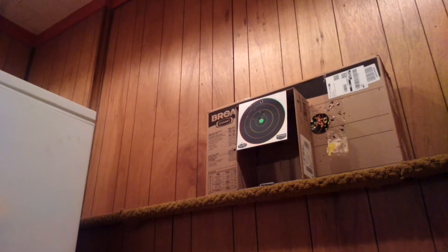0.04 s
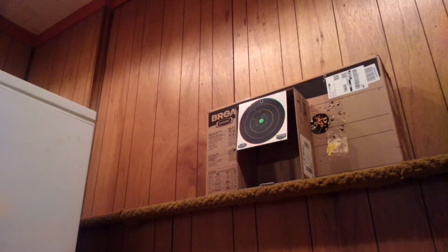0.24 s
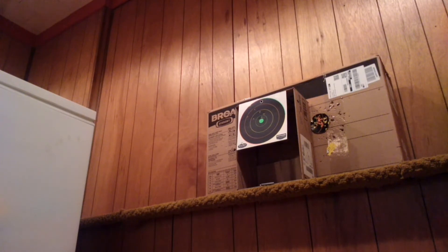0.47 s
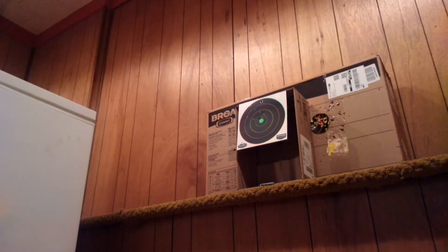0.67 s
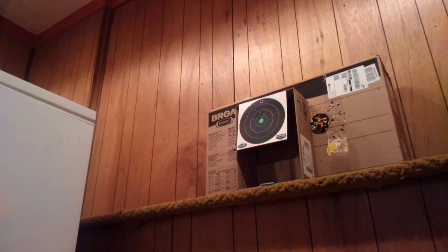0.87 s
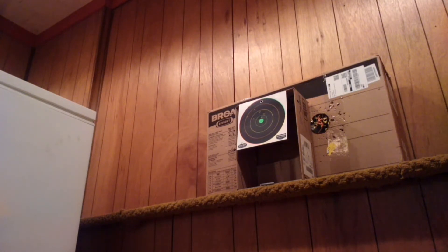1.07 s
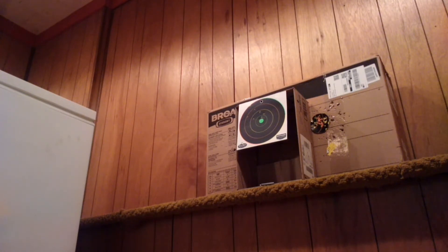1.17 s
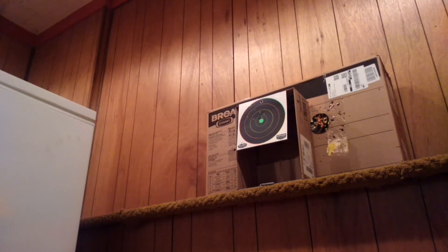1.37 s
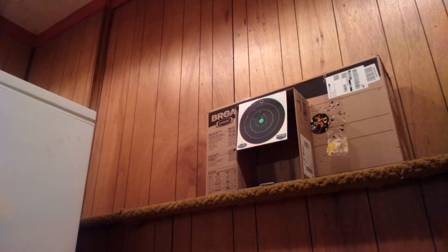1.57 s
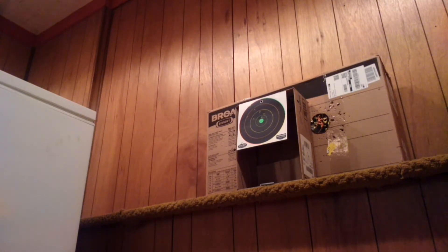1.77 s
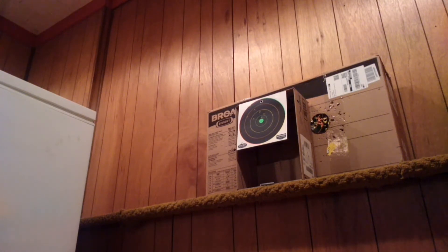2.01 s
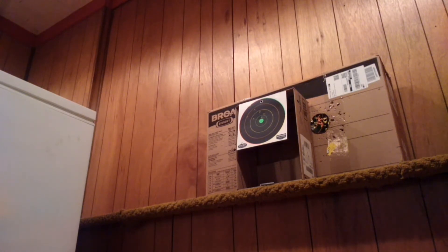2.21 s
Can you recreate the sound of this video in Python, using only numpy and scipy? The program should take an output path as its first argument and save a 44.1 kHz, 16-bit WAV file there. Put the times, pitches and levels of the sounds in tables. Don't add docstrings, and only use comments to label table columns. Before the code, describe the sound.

Single air pistol shot cracks into a cardboard box, followed by cocking clicks and cloth rustle.

```python
import sys
import numpy as np
from scipy import signal
from scipy.fft import rfft, irfft
from scipy.io import wavfile
from scipy.ndimage import map_coordinates

SR = 44100
rng = np.random.default_rng(int(sys.argv[2]) if len(sys.argv) > 2 else 0)


def generate_wav(signal):
    frames = np.transpose(np.atleast_2d(signal))
    scaled = np.clip(frames, -1, 1) * 32767
    pcm = np.round(scaled).astype(np.int16)
    wavfile.write(sys.argv[1], SR, pcm)


def volts_from_db(level):
    exponent = np.asarray(level, float) / 20
    return 10 ** exponent


N = 99225


def rms_one(x):
    return x / np.sqrt(np.mean(x ** 2) + 1e-20)


def at_hz(points, hz):
    p = np.array(points)
    return np.interp(np.log(np.maximum(hz, 1)), np.log(p[:, 0]), p[:, 1])


def colour(x, spectrum):
    size = x.shape[-1]
    hz = np.arange(size // 2 + 1) * SR / size
    return irfft(rfft(x) * volts_from_db(at_hz(spectrum, hz)), size)


def level(rows):
    s, db = np.transpose(rows)
    return volts_from_db(np.interp(np.arange(N) / SR, s, db, left=-120, right=-120))


def swell(start_s, rise_s, t60_s):
    t = np.arange(N) / SR - start_s
    rise = np.clip(t / rise_s, 0, 1) ** 2
    return rise * volts_from_db(-60 * np.maximum(t - rise_s, 0) / t60_s)


def band(x, hz, width_hz):
    r = np.exp(-np.pi * width_hz / SR)
    return signal.lfilter([1, 0, -1], [1, -2 * r * np.cos(2 * np.pi * hz / SR), r * r], x)


def grains(per_s, spread_db, spectrum):
    sizes = volts_from_db(spread_db * np.minimum(rng.exponential(1, N), 4)) * rng.standard_normal(N)
    happens = rng.random(N) < per_s / SR
    return rms_one(colour(sizes * happens, spectrum))


def sine(hz):
    return np.sin(2 * np.pi * hz * np.arange(N) / SR)


def contact(noise, s, db, hz, t60_s, rise_s):
    width_hz = hz / 2.17
    burst = band(band(noise, hz, width_hz), hz, 0.66 * width_hz) * swell(s, rise_s, t60_s)
    return volts_from_db(db) * burst / np.abs(burst).max()


def patches(x, gains):
    _, _, z = signal.stft(x, nperseg=512)
    bands = np.linspace(0, gains.shape[0] - 1, z.shape[0])
    moments = np.linspace(0, gains.shape[1] - 1, z.shape[1])
    at = np.meshgrid(bands, moments, indexing="ij")
    return signal.istft(z * map_coordinates(gains, at, order=1), nperseg=512)[1][:N]


# frequency in Hz, level in dB per Hz.
BLAST_SPECTRUM = [(530, -93), (900, -2.5), (2100, -9), (2280, 1), (2920, -15), (5710, 5.5), (13700, -15),
                  (14500, -48), (15000, -49)]


def shot():
    sear_s, rush_s, crack_s, box_s = .140, .152, .1608, .181
    sear_db, rush_db, crack_db, box_db, chatter_db = -40, -9, -9.5, -1.5, -15.5
    noise = rng.standard_normal(N)
    air = rms_one(colour(noise, BLAST_SPECTRUM))
    sear = rms_one(band(band(noise, 4900, 6400), 4900, 9000))
    sear = volts_from_db(sear_db) * sear * swell(sear_s - .003, 0.0019, 0.09)
    rush = volts_from_db(rush_db) * air * swell(rush_s, crack_s - rush_s, 0.028)
    crack = volts_from_db(crack_db) * rms_one(band(noise, 9500, 7500)) * swell(crack_s, 0.00042, 0.017)
    chatter = grains(1660, 2.1, BLAST_SPECTRUM)
    chatter = volts_from_db(chatter_db) * chatter * swell(crack_s - .002, 0.026, 0.082)
    box = volts_from_db(box_db) * air * swell(box_s, 0.00032, 0.004)
    return sear + rush + crack + chatter + box


# frequency in Hz, level in dB per Hz.
SLAM_SPECTRUM = [(26, -29), (45, -6.5), (527, -3.5), (639, -4.5), (840, -3.5), (971, -20.5), (1360, -13.5),
                 (1470, -22.5), (2100, -20), (2730, -34), (4620, -120)]


def piston_slam():
    start_s, rise_s, t60_s, knocks_per_s, slam_db = .1598, 0.001, 0.15, 1500, -15
    return volts_from_db(slam_db) * grains(knocks_per_s, 0.6, SLAM_SPECTRUM) * swell(start_s, rise_s, t60_s)


# start in seconds, level in dB.
SING_ONSETS = [
    (.236, -45),
    (.276, -50),
    (.30, -50),
    (.34, -56),
    (.405, -56),
    (.435, -53),
]


def singing_steel():
    hz, width_hz, rise_s, t60_s = 13050, 27, 0.0067, 0.14
    ring = rms_one(band(band(rng.standard_normal(N), hz, width_hz), hz, width_hz))
    return ring * sum(volts_from_db(db) * swell(s, rise_s, t60_s) for s, db in SING_ONSETS)


# start in seconds, peak in dB, pitch in Hz, ring T60 in seconds.
TICK_EVENTS = [(.402, -33, 9100, 0.0015), (0.4133, -22, 5200, 0.0037), (0.588, -44, 6900, 0.0026),
               (.612, -39.5, 5500, 0.0083), (.635, -40.5, 5000, 0.0055), (0.654, -39.5, 6300, 0.0093),
               (0.86, -38, 5660, 0.01), (.905, -44, 5400, .007), (1.15, -40, 1600, 0.018),
               (1.152, -38, 5970, 0.0036), (1.163, -34, 6100, 0.0042), (1.166, -42, 1260, 0.014),
               (1.191, -33, 1490, 0.015), (1.1982, -17, 1310, 0.0084), (1.2037, -10.5, 9200, 0.007),
               (1.220, -6.5, 5930, 0.018), (1.2375, -7, 5870, .004), (1.398, -20, 6040, 0.004),
               (1.398, -33.5, 1730, 0.024), (1.7104, -40.5, 6230, 0.0054), (1.763, -29.5, 7500, 0.0048),
               (1.775, -35, 5560, 0.0054), (1.848, -27.5, 11000, 0.0073), (1.9915, -37, 13400, 0.0079)]
# start in seconds, peak in dB, pitch in Hz, ring T60 in seconds, rise in seconds.
LATCH_EVENT = (1.2428, 3.0, 6800, .010, .0018)
# start in seconds, peak in dB, pitch in Hz, ring T60 in seconds.
BUMP_EVENTS = [
    (1.278, -42.5, 170, 0.09),
    (1.85, -40.5, 162, 0.22),
    (1.872, -43, 420, 0.11),
]
# time in seconds, level in dB.
SLIDE_PRESSURE = [(1.12, -69), (1.19, -51), (1.203, -29), (1.225, -24), (1.262, -19), (1.285, -49),
                  (1.33, -56), (1.40, -38.5), (1.47, -55)]
# frequency in Hz, level in dB per Hz.
SCRAPE_SPECTRUM = [(180, -73), (300, -16.5), (975, -12.5), (2210, -11.5), (2730, -3.5), (6840, -4.5),
                   (8600, -16), (14300, -11.5), (15000, -55)]


def action():
    noise = rng.standard_normal(N)
    ticks = sum(contact(noise, *row, rise_s=0.0018) for row in TICK_EVENTS)
    bumps = sum(contact(noise, *row, rise_s=0.018) for row in BUMP_EVENTS)
    latch = contact(noise, *LATCH_EVENT)
    scrape = grains(5000, 2.5, SCRAPE_SPECTRUM) * level(SLIDE_PRESSURE)
    return ticks + bumps + latch + scrape


# start in seconds, level in dB, pitch in Hz, rise in seconds, T60 in seconds.
HOLLOW_EVENTS = [
    (1.197, -24, 969, 0.0028, 0.099),
    (1.211, -21.5, 1667, 0.014, 0.053),
    (1.395, -33, 1650, 0.0022, 0.037),
]


def hollow_notes():
    return sum(volts_from_db(db) * sine(hz) * swell(s, rise_s, t60_s) for s, db, hz, rise_s, t60_s in HOLLOW_EVENTS)


# time in seconds, level in dB.
HAND_MOTION = [(.38, -48), (.42, -47), (.5, -64), (.57, -59.5), (.65, -59.5), (.73, -64.5), (.78, -53),
               (.87, -46.5), (.95, -53.5), (1.06, -67.5), (1.75, -67), (1.765, -52), (1.835, -52.5),
               (1.85, -37.5), (1.91, -35.5), (1.97, -46.5), (2.03, -45), (2.14, -101)]
# frequency in Hz, level in dB per Hz.
EARLY_SPECTRUM = [(710, -32), (1200, -18), (1650, -13), (2490, -4.5), (4050, -12), (5550, 0), (13600, -22),
                  (14500, -24), (15000, -72)]
# frequency in Hz, level in dB per Hz.
LATE_SPECTRUM = [(530, -26), (900, -9.5), (1140, -21.5), (2000, -1.5), (2200, -6.5), (6200, 1), (9480, -4),
                 (14300, -9), (15000, -26)]


def rustle():
    change_s, fleck_db = 1.4, 0.5
    late = np.arange(N) / SR > change_s
    cloth = np.where(late, grains(8000, 1.0, LATE_SPECTRUM), grains(8000, 2.8, EARLY_SPECTRUM))
    flecks = volts_from_db(fleck_db * rng.standard_normal((24, 70)))
    return patches(cloth, flecks) * level(HAND_MOTION)


# frequency in Hz, T60 in seconds.
ROOM_DECAY = [(100, 0.195), (400, 0.44), (1200, 0.4), (3000, 0.43), (5500, 0.37), (9000, 0.26),
              (14000, 0.26)]


def room(x):
    room_db, first_echo_s, build_s = 1, 0.0016, 0.0033
    white = rng.standard_normal((2, 2, N))
    late = np.roll(x, int(first_echo_s * SR))
    build = np.exp(-1 / (build_s * SR))
    edges_hz = 60 * 2 ** (np.arange(25) / 3)
    out = 0
    for k, (low, high) in enumerate(zip(edges_hz, edges_hz[1:])):
        sos = signal.butter(2, [low, high], "band", fs=SR, output="sos")
        fall = volts_from_db(-120 / (SR * at_hz(ROOM_DECAY, np.sqrt(low * high))))
        power = signal.sosfilt(sos, late) ** 2
        power = signal.lfilter([1 - build], [1, -build], power)
        stored = signal.lfilter([1 - fall], [1, -fall], power)
        out = out + rms_one(signal.sosfilt(sos, white[k % 2])) * np.sqrt(stored)
    return volts_from_db(room_db) * out


# frequency in Hz, level in dB rms, width in Hz.
MOTOR_LINES = [(41, -53, 6), (59.75, -50, 4.8), (81.1, -50, 4.1), (122.6, -50.5, 2.4), (170, -81.5, 10.4),
               (194, -67.5, 6), (403.7, -70, 10), (587.4, -71, 6.7)]
# frequency in Hz, level in dB rms.
MAINS_TONES = [(59.2, -47.5), (119, -49)]


def appliance():
    noise = rng.standard_normal(N + SR)
    motor = sum(volts_from_db(db) * rms_one(band(noise, hz, width_hz)[SR:]) for hz, db, width_hz in MOTOR_LINES)
    mains = sum(volts_from_db(db) * np.sqrt(2) * sine(hz) for hz, db in MAINS_TONES)
    return motor + mains


# frequency in Hz, level in dB per Hz.
AIR_SPECTRUM = [(15, -41.5), (25, -8.5), (133, -7.5), (328, -25), (451, -12.5), (654, -48), (830, -23.5),
                (948, -47), (14200, -33.5)]


def air_noise():
    return volts_from_db(-50.5) * rms_one(colour(rng.standard_normal((2, N)), AIR_SPECTRUM))


# frequency in Hz, side minus mid in dB.
PORT_DIFFERENCE = [(1500, -29), (3000, -21), (4500, -17.5), (6500, -6.5), (9000, -1.5), (14000, -2)]


def scene():
    slam, air = piston_slam(), air_noise()
    notes = hollow_notes() + singing_steel()
    source = shot() + action() + rustle()
    wet = room(source + volts_from_db(-6.5) * slam + volts_from_db(-7.5) * notes)
    uneven = volts_from_db(2.2 * rng.standard_normal((90, 40)))
    mid = source + slam + notes + patches(wet[0], uneven) + appliance() + air[0]
    delayed = np.roll(source, 23)
    side = colour(volts_from_db(1.5) * delayed + wet[1] + air[1], PORT_DIFFERENCE)
    return np.array([mid + side, mid - side])


def top_cut(x):
    return signal.sosfilt(signal.butter(12, 15460, fs=SR, output="sos"), x)


# frequency in Hz, share from 0 to 1.
SIDE_SHARE = [(300, .02), (3800, .03), (4500, .2), (6000, .4), (7500, .65), (12000, .68), (14000, .45)]


def record(dry):
    clip_top, cutoff_hz, patch_hz, patch_s = .9, 14330, 900, .04
    left, right = clip_top * np.tanh(dry / clip_top)
    centres_hz = np.arange(.5, SR / 2 / patch_hz) * patch_hz
    draws = rng.random((len(centres_hz), int(N / SR / patch_s)))
    kept = draws < at_hz(SIDE_SHARE, centres_hz)[:, None]
    sharp = np.repeat(np.repeat(kept * 1., 6, axis=0), 4, axis=1)
    side = patches((left - right) / 2, sharp)
    both = (left + right) / 2 + side * [[1], [-1]]
    low_pass = signal.ellip(12, .3, 70, cutoff_hz, fs=SR, output="sos")
    return top_cut(signal.sosfilt(low_pass, both))


dry = scene()
out = record(dry)
generate_wav(out)
```